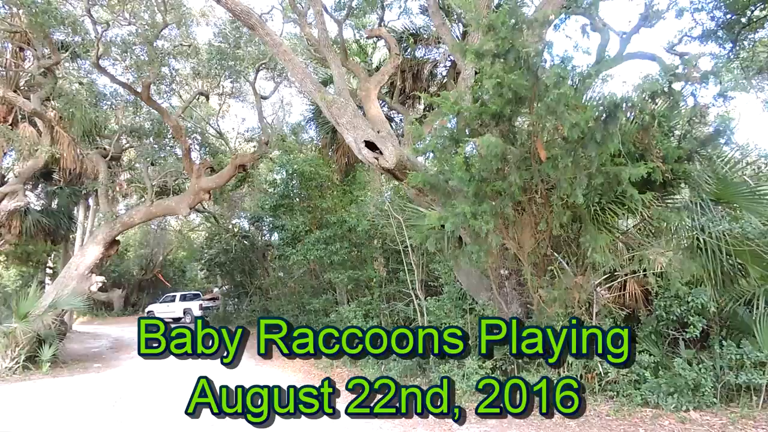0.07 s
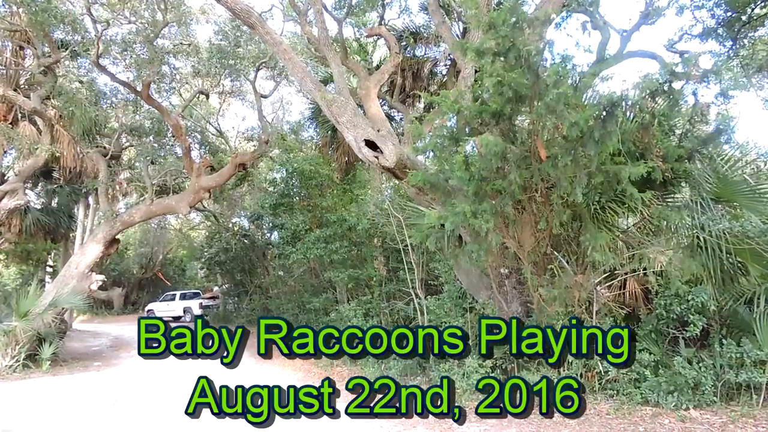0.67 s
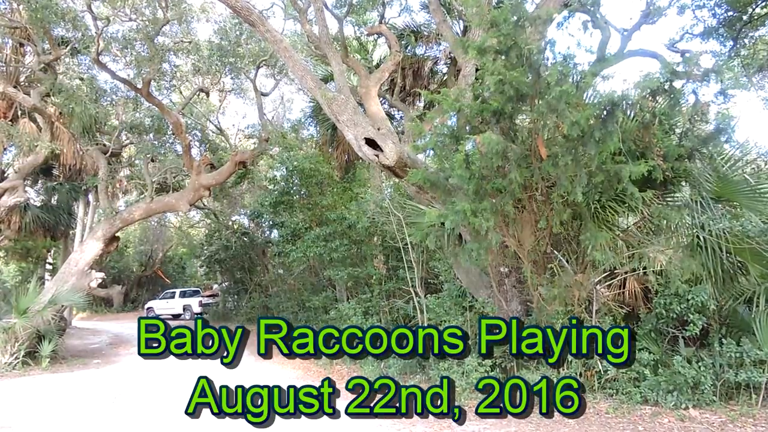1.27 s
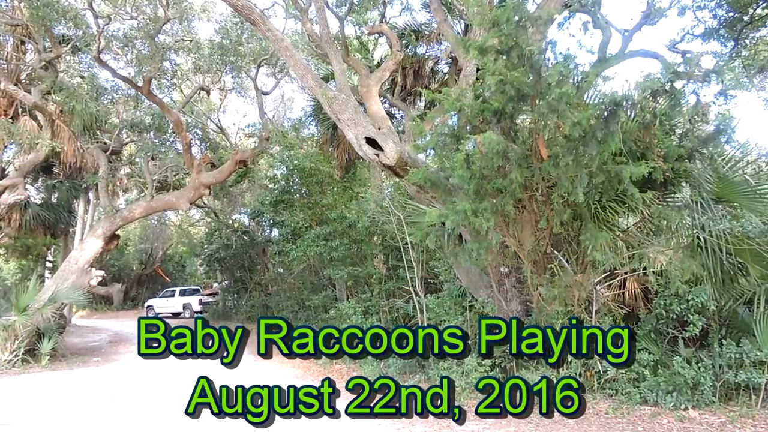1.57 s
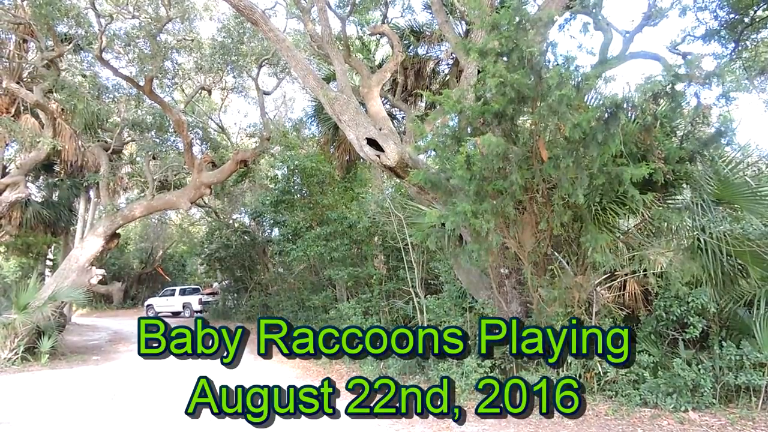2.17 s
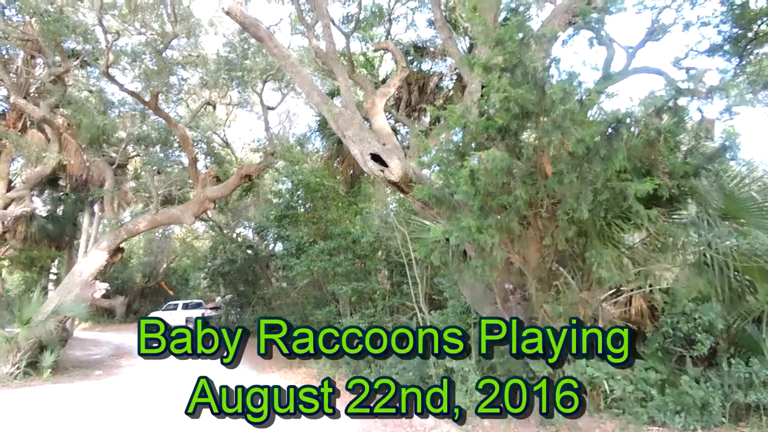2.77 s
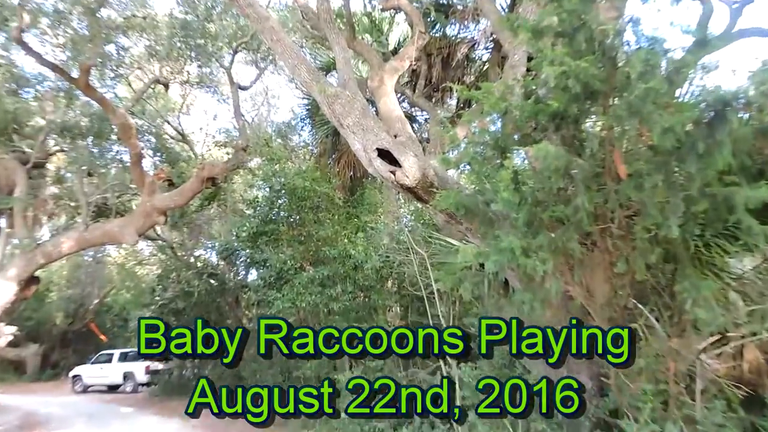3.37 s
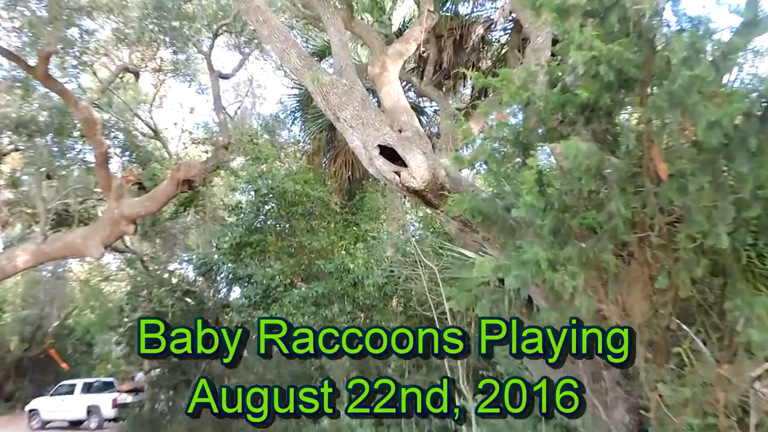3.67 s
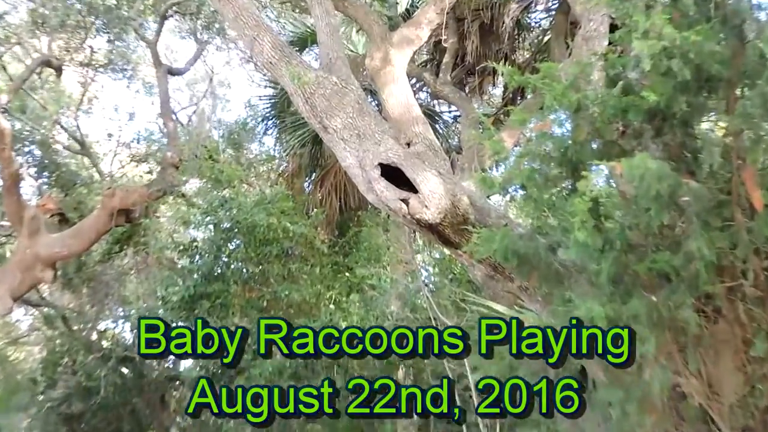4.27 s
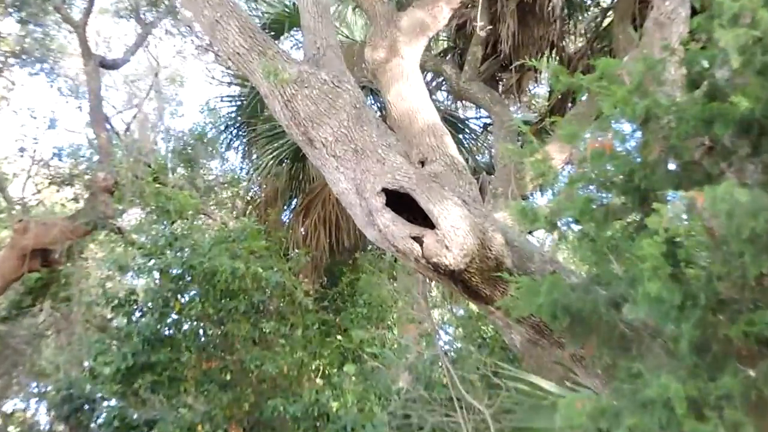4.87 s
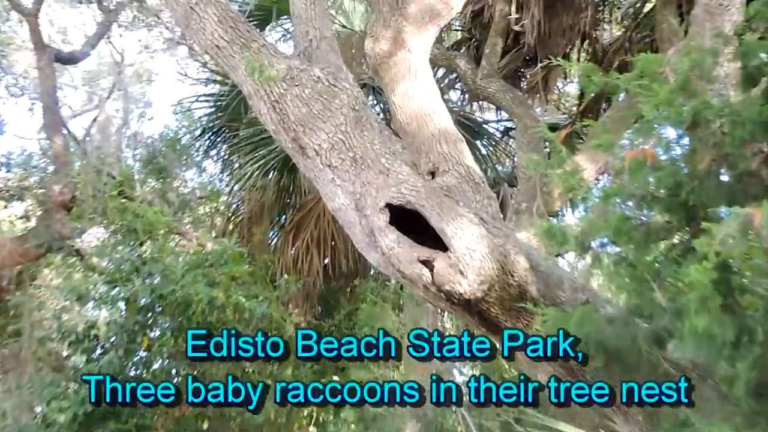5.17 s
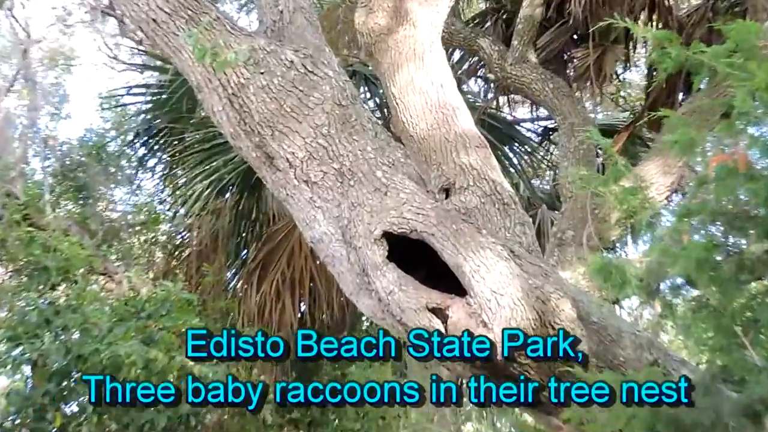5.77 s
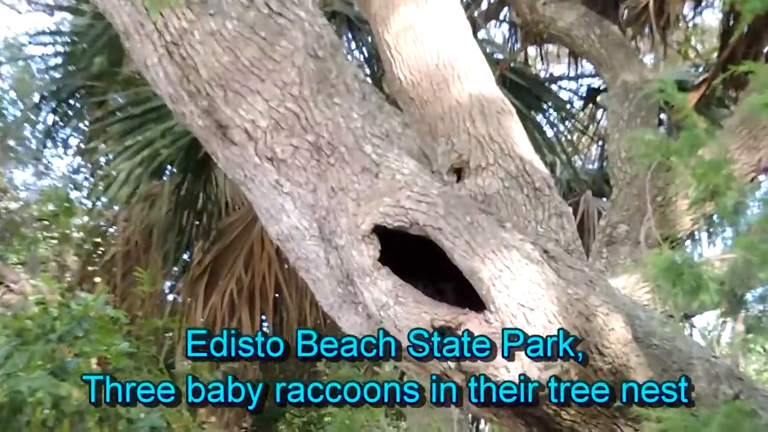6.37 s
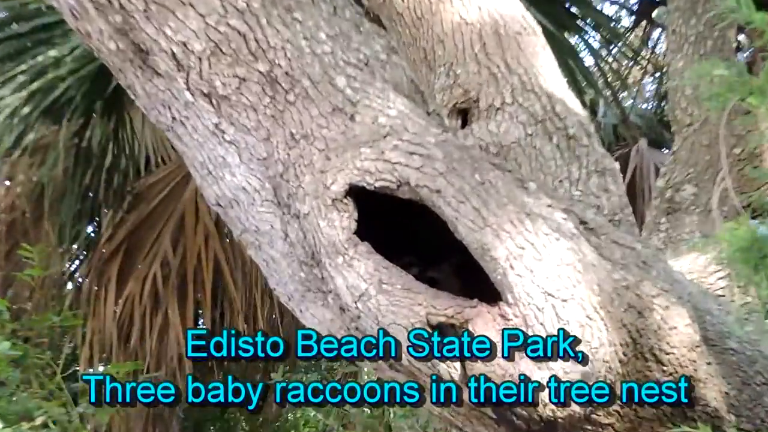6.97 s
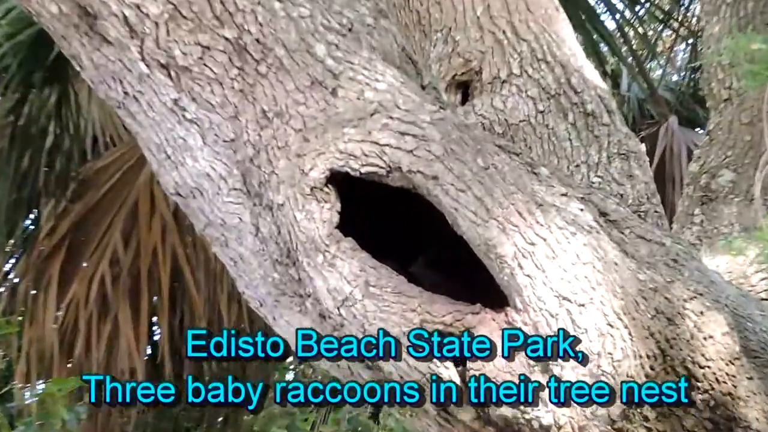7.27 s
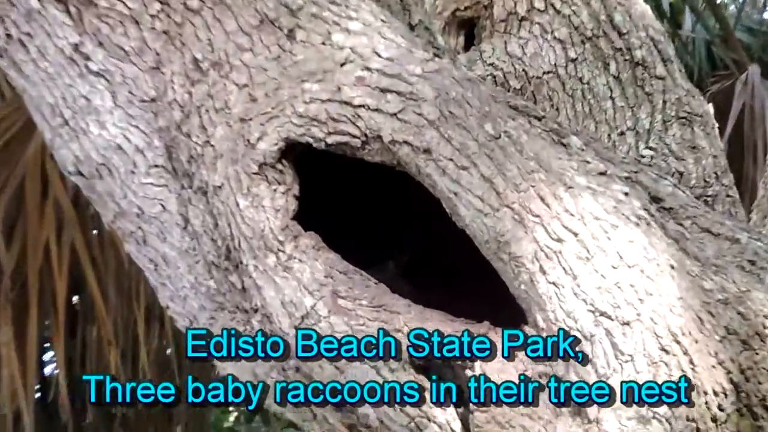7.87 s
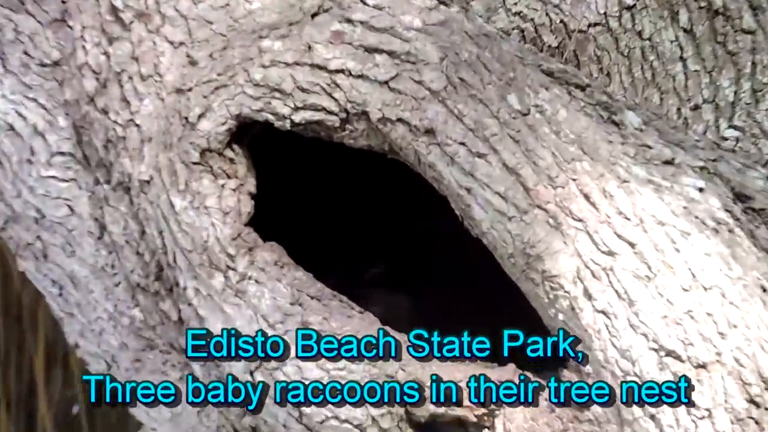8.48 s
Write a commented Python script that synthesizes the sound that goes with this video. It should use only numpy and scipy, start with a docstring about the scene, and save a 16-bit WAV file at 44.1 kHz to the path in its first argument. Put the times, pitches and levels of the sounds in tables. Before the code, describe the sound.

Light wind gusts rumble and thump on a close microphone over soft outdoor hiss, with a few handling clicks and faint bird chips.

```python
"""Light wind in a wooded park

A hand-held camera with two microphone ports. Distant air and leaves lie in a soft wash over the
hiss; at 2.48 s the wash drops abruptly and the camera's faint whines come in. A tiny bird chips far
away. Close up, fingers click on the case and light gusts buffet the ports, mostly the right."""
import sys
import numpy as np
from scipy import signal
from scipy.fft import rfft, irfft
from scipy.io import wavfile
from scipy.ndimage import uniform_filter1d

SR = 44100
rng = np.random.default_rng(int(sys.argv[2]) if len(sys.argv) > 2 else 0)


def generate_wav(signal):
    """Clip the signal to [-1, 1] and save it as 16-bit WAV at the path in sys.argv[1]."""
    frames = np.transpose(np.atleast_2d(signal))
    scaled = np.clip(frames, -1, 1) * 32767
    pcm = np.round(scaled).astype(np.int16)
    wavfile.write(sys.argv[1], SR, pcm)


N = 376173
TIME = np.arange(N) / SR
HZ = np.fft.rfftfreq(N, 1 / SR)
START_S, DROP_S = 0.165, 2.48


def gain_of(db):
    """Decibels to amplitude."""
    return 10 ** (np.asarray(db) / 20)


def unit_rms(x):
    """Scales to rms 1."""
    return x / np.sqrt(np.mean(x ** 2) + 1e-20)


def over_hz(table):
    """The columns of a table, joined on a log-frequency axis."""
    hz, *columns = np.transpose(table)
    return [np.interp(np.log(HZ + 1), np.log(hz + 1), column) for column in columns]


def white():
    """Spectrum of white noise of rms 1."""
    return rfft(rng.standard_normal(N))


def noise_band(hz, width_hz):
    """A narrow noise band of rms 1: a fuzzy tone, or a slow drift when centred on 0 Hz."""
    return unit_rms(irfft(white() * np.exp(-((HZ - hz) / width_hz) ** 2), N))


def add(mix, start_s, sound):
    """Mixes a sound in at its start time."""
    part = mix[..., round(start_s * SR):][..., :sound.shape[-1]]
    part += sound[..., :part.shape[-1]]


def wash(flutter_db=0.38, flutter_hz=9):
    """Distant air reaches both ports alike in the bass; leaves and hiss are unrelated in the treble."""
    # The wash's base spectrum. Each row: frequency in Hz, left and right level in dB per Hz.
    spectrum = [(20, -65, -59), (110, -69.5, -71), (240, -73, -73.5), (390, -77, -77), (507, -75.5, -78),
                (667, -77, -82), (1030, -78.5, -83.5), (1150, -81, -86.5), (1860, -83.5, -82),
                (3290, -88, -87), (5430, -90.5, -91.5), (11300, -95, -96), (13800, -101.5, -101.5),
                (15800, -104, -106)]
    # How alike the ports hear it. Each row: frequency in Hz, coherence, left's lead in radians.
    likeness = [(60, 0.89, 1), (340, 1, -0.3), (540, 0.98, -0.4), (835, 0.96, 0.88), (1200, 0.66, -0.5),
                (2010, 0.76, -1.5), (2960, 0.17, -0.8), (4160, 0.13, -2.5), (6000, 0.095, -2.5),
                (15000, .05, -2.5)]
    # Extra level before the drop. Each row: frequency in Hz, boost in dB.
    early_boost = [(100, 5.5), (600, 6), (2000, 6), (5000, 5), (9000, 5.5), (12500, 5.5), (14200, 5),
                   (15500, 1)]
    # The slow swell. Each row: time in seconds, gain in dB.
    swell = [(.17, -0.85), (1.2, 0.5), (1.9, 0.5), (2.4, 2.4), (2.8, 1.2), (4.4, 1), (6.3, 0.94),
             (8.5, -0.2)]
    coherence, lead = over_hz(likeness)
    left = white()
    right = (coherence * left + np.sqrt(1 - coherence ** 2) * white()) * np.exp(-1j * lead)
    ports = np.array([left, right]) * gain_of(over_hz(spectrum)) * np.sqrt(SR / 2)
    louder = irfft(ports * gain_of(over_hz(early_boost)[0]), N)
    air = np.where(TIME < DROP_S, louder, irfft(ports, N))
    swell_db = np.interp(TIME, *np.transpose(swell))
    return air * gain_of(swell_db + flutter_db * noise_band(0, flutter_hz))


def camera_whines(waver_db=2, waver_hz=2, right_db=-15):
    """Faint wavering bands from the camera, close to the left port, heard once the wash drops."""
    # The thin whines. Each row: centre in Hz, width in Hz, level at the left port in dB.
    bands = [(2530, 400, -60), (4790, 420, -64), (10250, 550, -68.5), (14950, 520, -69)]
    out = sum(gain_of(db + waver_db * noise_band(0, waver_hz)) * noise_band(hz, width_hz)
              for hz, width_hz, db in bands)
    return out * (TIME > DROP_S) * gain_of([[0], [right_db]])


def far_bird(chip_hz=7760, blur_hz=270, half_width_s=0.033, gap_s=0.105, jitter_s=0.012, right_db=-3):
    """Very high, thin chips in twos and threes, sung with two voices at once and blurred by the trees."""
    # The short phrases. Each row: first chip in seconds, number of chips, level in dB.
    phrases = [(.78, 2, -56), (1.61, 3, -56), (5.17, 2, -61), (6.91, 3, -62)]
    out = np.zeros(N)
    for start, count, db in phrases:
        for chip_s in start + gap_s * np.arange(count) + jitter_s * rng.standard_normal(count):
            near = abs(TIME - chip_s) < 0.1
            envelope = np.exp(-((TIME[near] - chip_s) / half_width_s) ** 2)
            for pitch_ratio, voice_db in [(1, 0), (0.79, -4)]:
                blur = unit_rms(uniform_filter1d(rng.standard_normal(len(envelope)), size=50))
                phase = 2 * np.pi * np.cumsum(chip_hz * pitch_ratio + blur_hz * blur) / SR
                out[near] += gain_of(db + voice_db) * envelope * np.sin(phase)
    return out * gain_of([[0], [right_db]])


def finger_clicks(breadth_octaves=0.96, body_db=6, body_width_hz=450):
    """Each contact knocks the case into a brief ring and scrapes out noise that the case colours."""
    # Fingers on the case. Each row: start in seconds, scrape level in dB, scrape decay in ms,
    # scrape centre in Hz, knock level in dB.
    contacts = [(2.096, -18.5, 1.24, 2050, -30), (2.222, -34, 3.7, 12500, -54), (2.33, -35, 22, 2300, -50),
                (2.5217, -38, 1.5, 6000, -56), (2.6735, -25, 0.73, 5200, -34.5),
                (2.9727, -36, 1.5, 6300, -59), (2.988, -35, 1.6, 6000, -45),
                (3.028, -18.5, 0.78, 10500, -22.5), (7.481, -44.5, 20, 6500, -68)]
    # The plastic case's modes. Each row: frequency in Hz, level in dB, time to fall 60 dB in ms.
    modes = [(1100, -2.5, 14), (1400, -3, 8.7), (2020, -3.5, 7.5), (3780, -9, 6), (5100, -8, 8),
             (6370, -8, 6), (8800, -5, 3.9), (12400, -17, 2.8)]
    out = np.zeros((2, N))
    ms = np.arange(4096) * 1000 / SR
    bins = np.fft.rfftfreq(len(ms), 1 / SR)
    peaks = [np.exp(-((bins - hz) / body_width_hz) ** 2) for hz, _, _ in modes]
    body = gain_of(body_db * np.max(peaks, axis=0))
    ring = sum(gain_of(db - 60 * ms / t60) * np.sin(2 * np.pi * hz * ms / 1000) for hz, db, t60 in modes)
    for start, scrape_db, decay_ms, centre_hz, knock_db in contacts:
        colour = body / np.hypot(1, np.log2((bins + 1) / centre_hz) / breadth_octaves)
        noise = rfft(rng.standard_normal((2, len(ms))))
        scrape = unit_rms(irfft(noise * colour)) * np.exp(-ms / decay_ms)
        add(out, start, gain_of(scrape_db) * scrape + gain_of(knock_db) * ring)
    # The small case gives no bass, and the narrow ports dull the highest treble.
    passband = signal.butter(2, [750, 13200], "band", fs=SR, output="sos")
    return signal.sosfilt(passband, out) * gain_of([[-0.25], [0.25]])


def airflow(port, rise_db_per_s=182, fall_db_per_s=96):
    """Level and eddy corner at a port: gusts rise, hold and die over a breeze, weighted by power."""
    # The steady breeze, left port then right. Each row: level in dB, eddy corner in Hz.
    breeze = [(-46, 110), (-41, 91)]
    # The gusts. Each row: start and hold in seconds, right and left level in dB, eddy corner in Hz.
    gusts = [(.21, 0.15, -37.5, -51, 90), (0.754, 0.17, -26, -48, 86), (1.353, 0.047, -23, -44, 116),
             (1.6, .11, -24, -47, 93), (2.038, 0.44, -24, -37, 104), (2.73, 0.017, -29, -50, 108),
             (3.228, 0.27, -28, -40, 104), (3.716, 0.22, -28.5, -43, 104), (4.03, 0.042, -22, -41, 138),
             (4.233, 0.037, -19.5, -41, 137), (4.442, 0.15, -25, -34, 124), (4.75, 0.089, -33.5, -38, 89),
             (5.05, 0.23, -27, -35.5, 170), (5.3, 0.1, -26, -34, 169), (5.579, .17, -23.5, -38, 122),
             (5.806, 0.07, -21, -34, 158), (5.992, 0.27, -25.5, -32.5, 150), (6.375, 0.083, -28, -40, 145),
             (7.22, 0.24, -31, -35.5, 80.6), (7.716, 0.033, -35.5, -36, 85), (8.067, 0.14, -23, -42, 166),
             (8.397, 0.13, -23, -42, 161)]
    breeze_db, breeze_hz = breeze[port]
    power = np.full(N, gain_of(breeze_db) ** 2)
    weighted_hz = power * breeze_hz
    for start, hold, right_db, left_db, corner_hz in gusts:
        ramps_db = np.minimum(rise_db_per_s * (TIME - start), fall_db_per_s * (start + hold - TIME))
        gust_power = gain_of((left_db, right_db)[port] + np.minimum(ramps_db, 0)) ** 2
        power += gust_power
        weighted_hz += gust_power * corner_hz
    return 10 * np.log10(power), weighted_hz / power


def wind(port, trim_db, lumpy_db, lump_hz=35, low_cut_hz=22, rolloff_order=3.97):
    """Turbulent pressure on one port: faster air makes smaller eddies, so the rumble reaches higher."""
    level_db, corner_hz = airflow(port)
    lumps = noise_band(0, lump_hz)
    turbulence = white() * HZ / np.hypot(HZ, low_cut_hz)
    # Crossfade between low-passed copies of the noise to follow the moving eddy corner.
    bank_hz = np.geomspace(50, 400, 7)
    place = np.interp(np.log(corner_hz) + 0.081 * lumps, np.log(bank_hz), np.arange(len(bank_hz)))
    rumble = np.zeros(N)
    for k, hz in enumerate(bank_hz):
        eddies = irfft(turbulence / (1 + (HZ / hz) ** 2) ** (rolloff_order / 2), N)
        rumble += np.maximum(1 - abs(place - k), 0) * unit_rms(eddies)
    rumble *= gain_of(lumpy_db * lumps)
    # The gust sets the strength; the eddies only share it out.
    local_power = uniform_filter1d(uniform_filter1d(rumble ** 2, size=4000), size=3000)
    return gain_of(level_db + trim_db) * rumble / np.sqrt(local_power + 1e-9)


def buffets(lean=0.41):
    """A vortex passing a port: a dip of pressure between two opposite lobes, steeper on its front."""
    # The hardest thumps. Each row: time in seconds, peak in dB, half width in ms, port (0 left, 1 right).
    thumps = [(1.393, -6.5, 3.4, 1), (2.177, -13, 2.5, 1), (3.928, -19.5, 1.5, 1), (5.367, -11, 1.84, 1),
              (5.873, -12.5, 1.22, 0), (6.247, -14, 2.3, 1), (8.071, -11.5, 2, 1), (8.158, -10, 1.7, 1),
              (8.467, -11, 1.5, 1)]
    out = np.zeros((2, N))
    t = np.arange(-SR // 40, SR // 40) / SR
    for centre_s, db, half_width_ms, port in thumps:
        passage = t * 1000 / half_width_ms
        skewed = passage * (1 - lean * np.tanh(passage))
        pressure = (skewed ** 2 - 1) * np.exp(-skewed ** 2 / 2)
        add(out[port], centre_s + t[0], gain_of(db) * pressure)
    return out


def scene():
    """The park and the camera's own noises at the two ports, left then right."""
    rumble = np.array([wind(0, trim_db=-1.5, lumpy_db=0), wind(1, trim_db=1.16, lumpy_db=3)])
    return wash() + rumble + buffets() + finger_clicks() + camera_whines() + far_bird()


def record(dry):
    """The microphone opens after a moment of silence and hears up to 15.75 kHz."""
    lowpass = signal.firwin(511, 15750, window=("kaiser", 9), fs=SR)
    return signal.oaconvolve(dry * (TIME >= START_S), lowpass[None], "same")


dry = scene()
out = record(dry)
generate_wav(out)
```